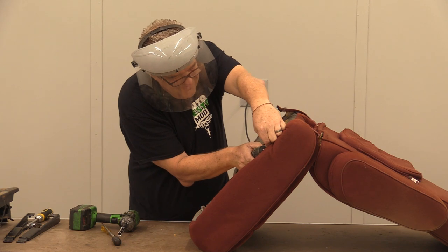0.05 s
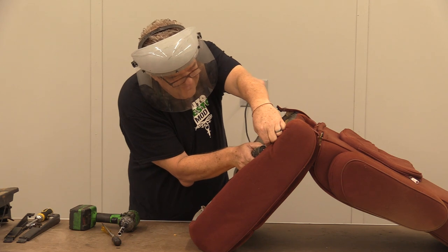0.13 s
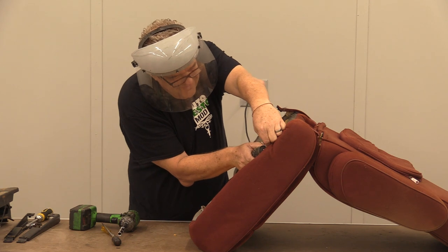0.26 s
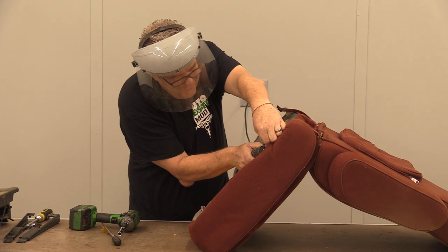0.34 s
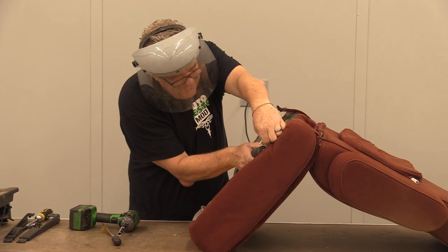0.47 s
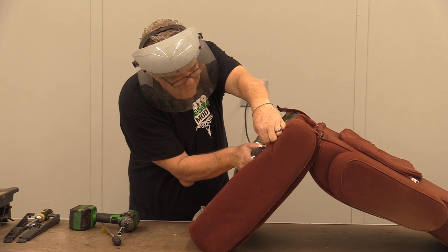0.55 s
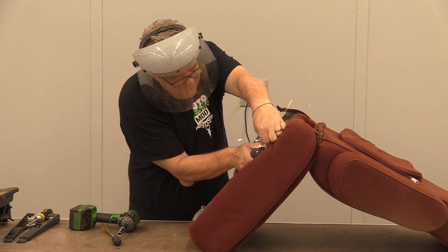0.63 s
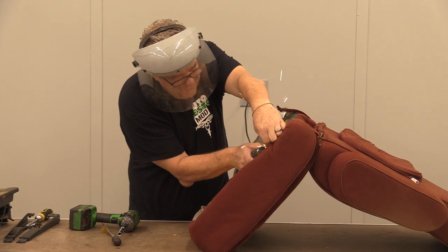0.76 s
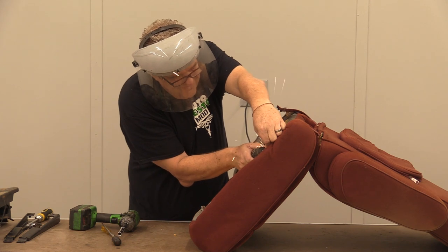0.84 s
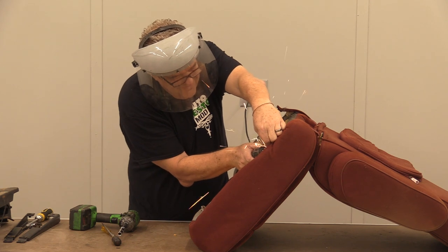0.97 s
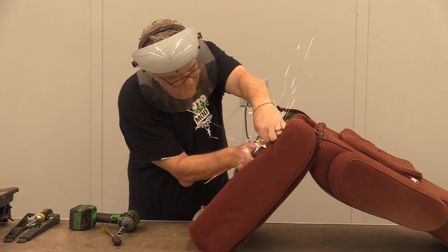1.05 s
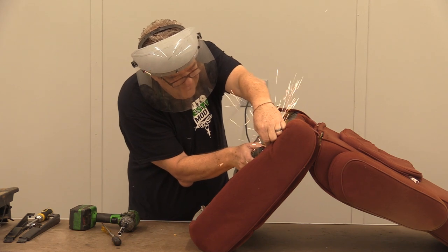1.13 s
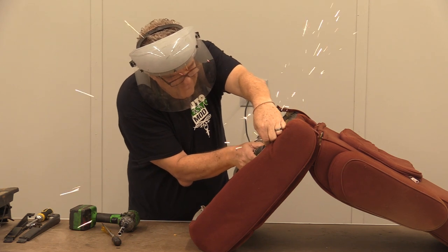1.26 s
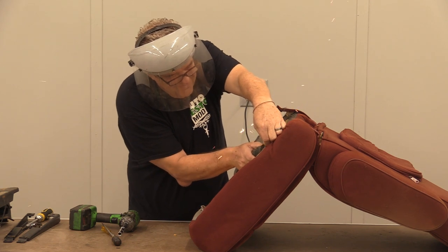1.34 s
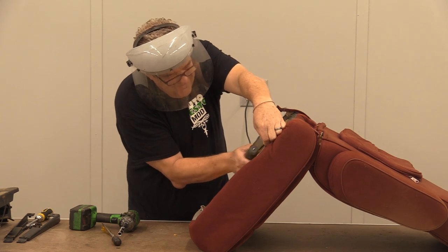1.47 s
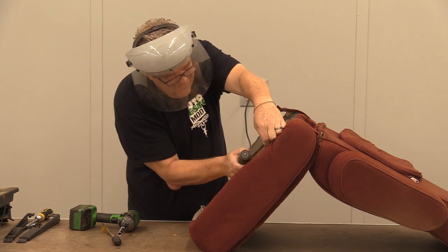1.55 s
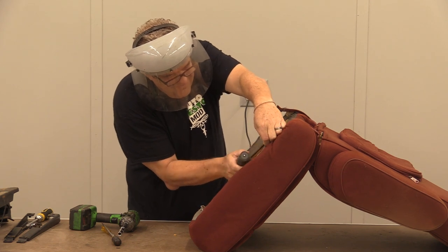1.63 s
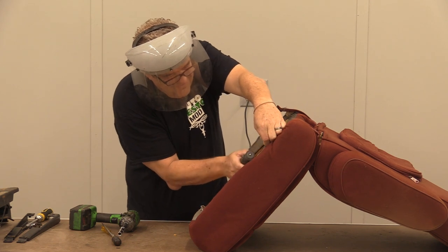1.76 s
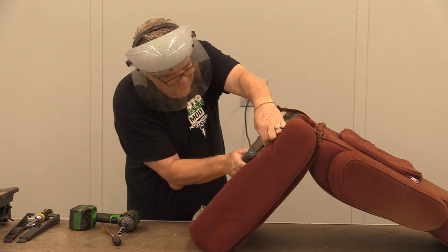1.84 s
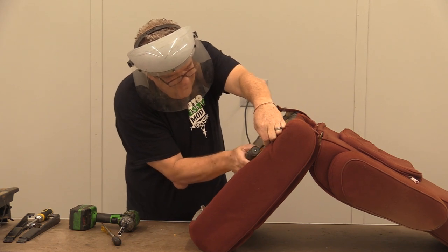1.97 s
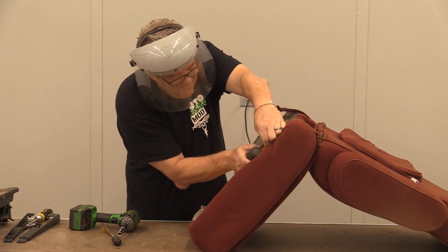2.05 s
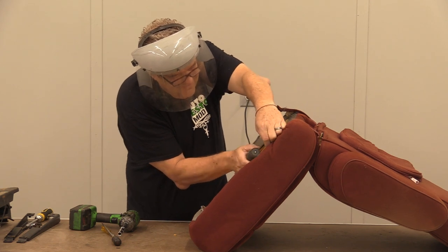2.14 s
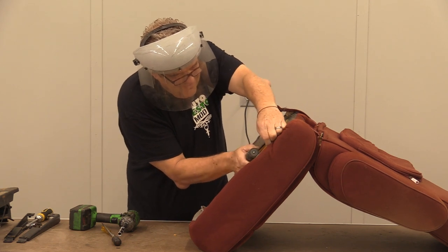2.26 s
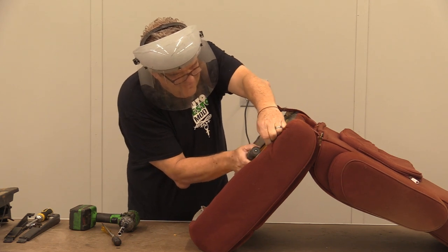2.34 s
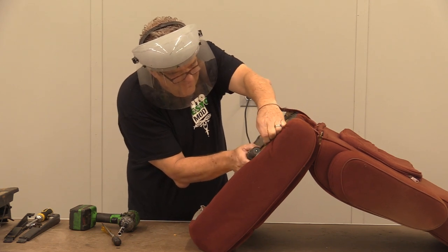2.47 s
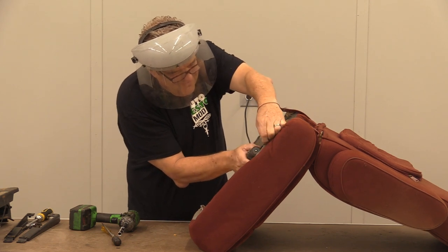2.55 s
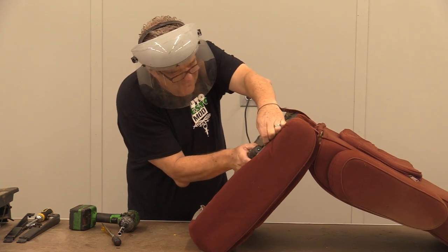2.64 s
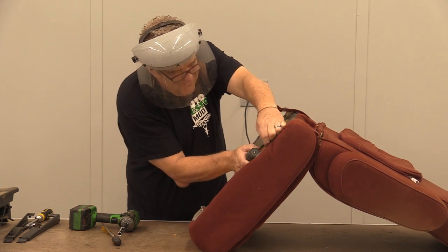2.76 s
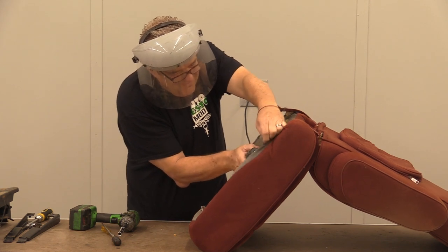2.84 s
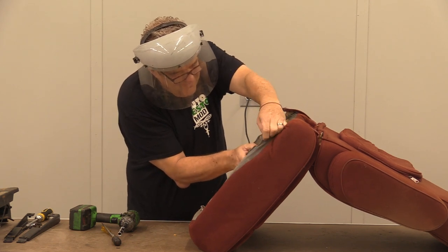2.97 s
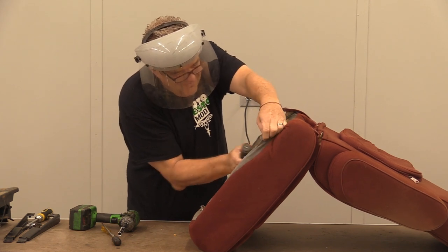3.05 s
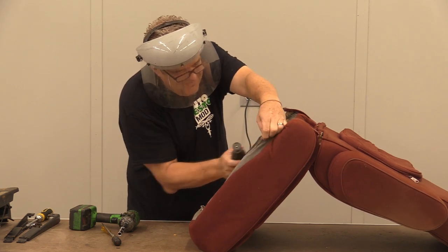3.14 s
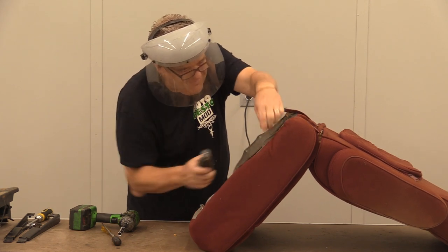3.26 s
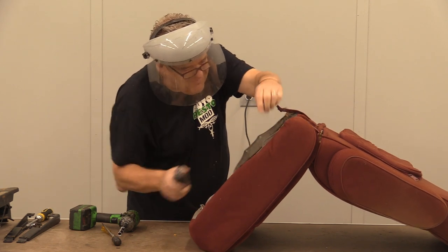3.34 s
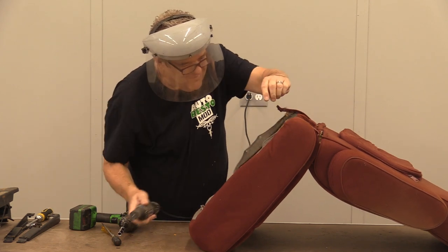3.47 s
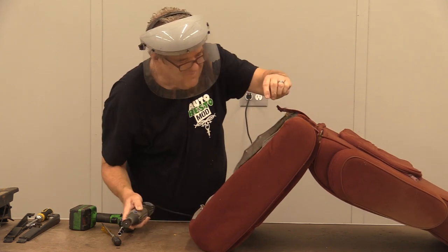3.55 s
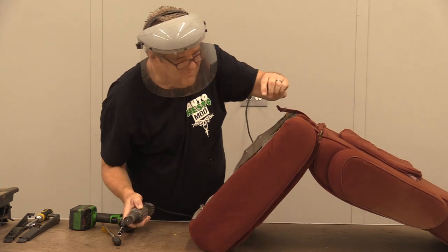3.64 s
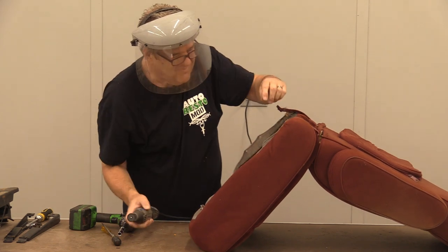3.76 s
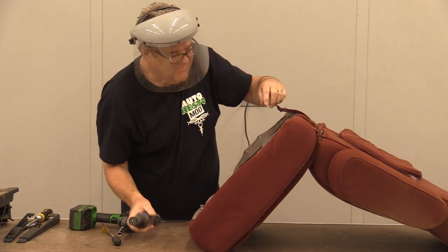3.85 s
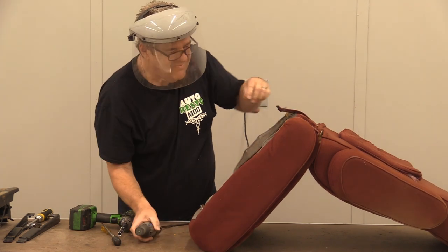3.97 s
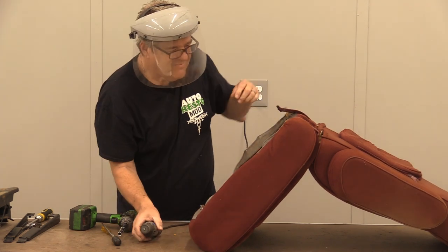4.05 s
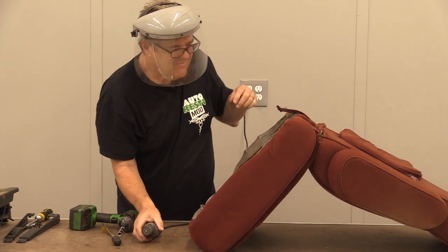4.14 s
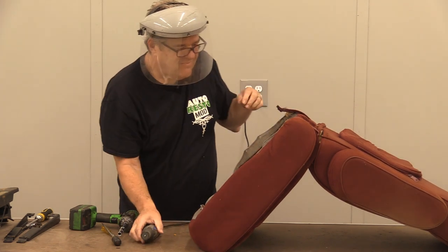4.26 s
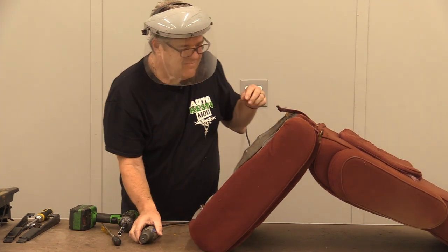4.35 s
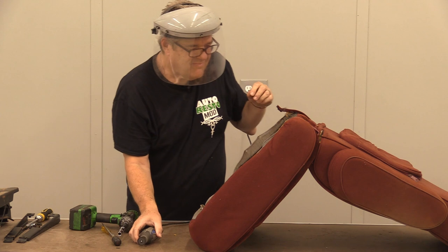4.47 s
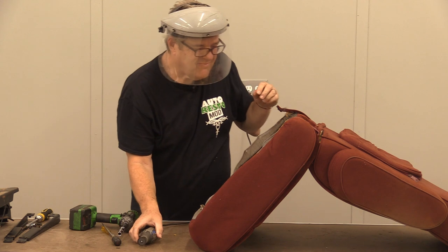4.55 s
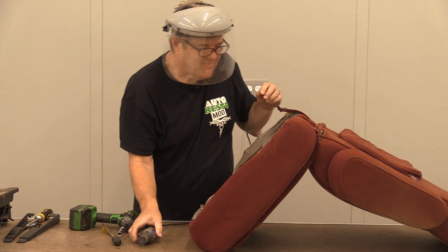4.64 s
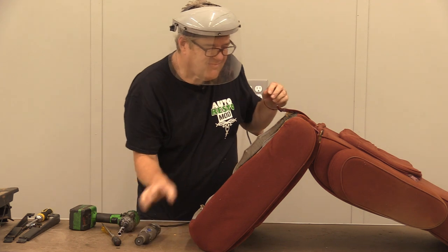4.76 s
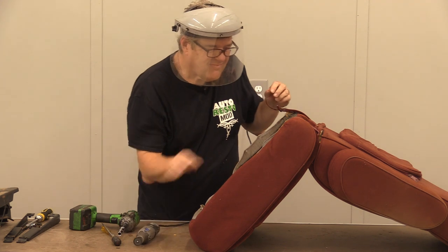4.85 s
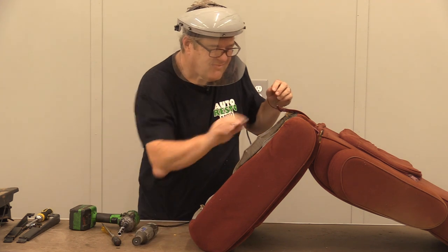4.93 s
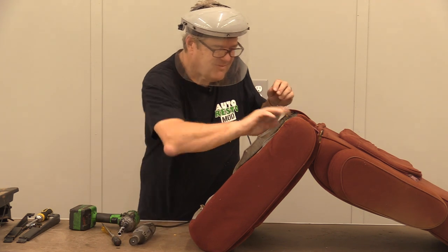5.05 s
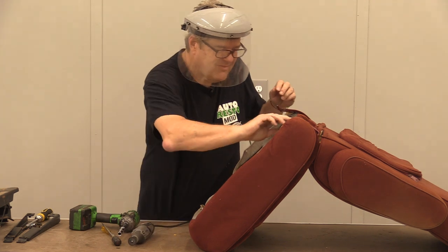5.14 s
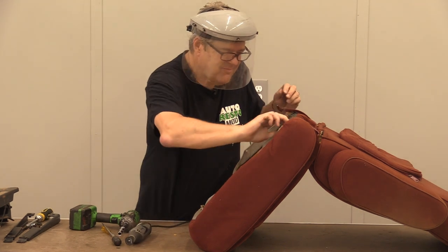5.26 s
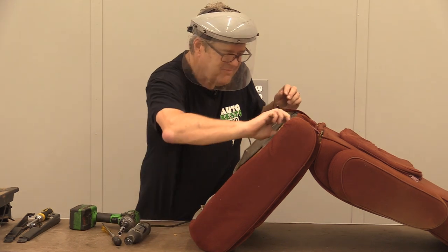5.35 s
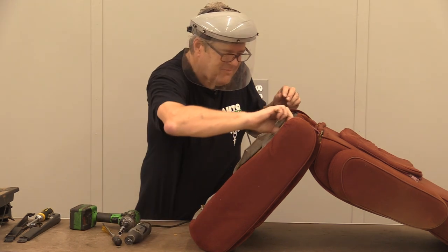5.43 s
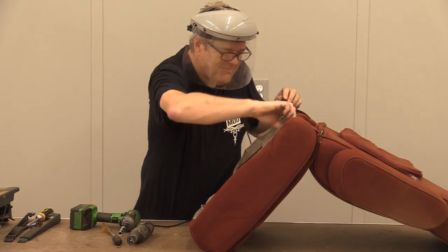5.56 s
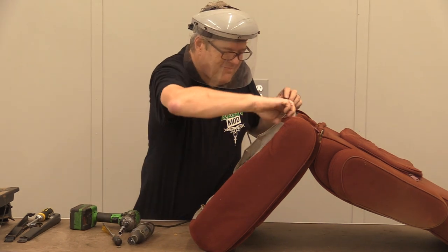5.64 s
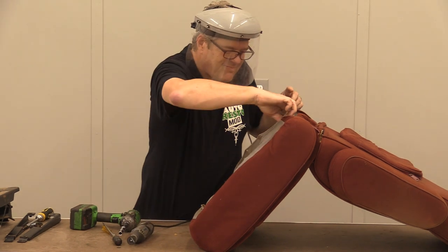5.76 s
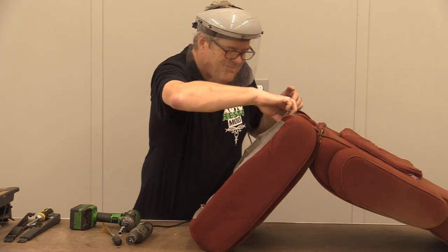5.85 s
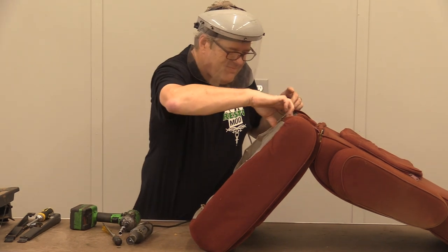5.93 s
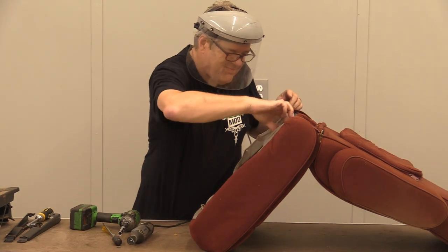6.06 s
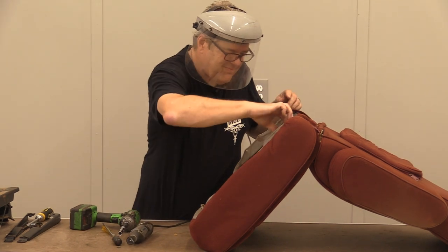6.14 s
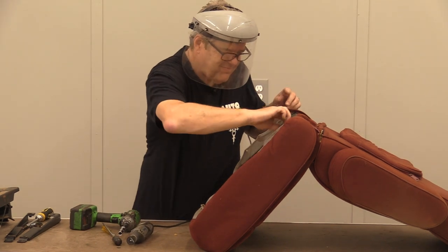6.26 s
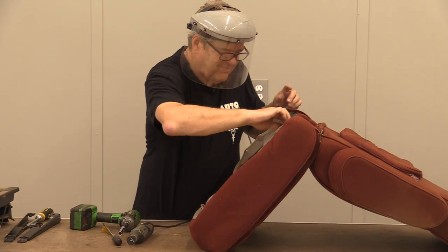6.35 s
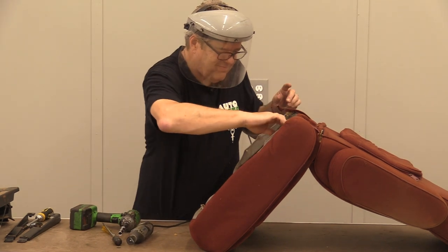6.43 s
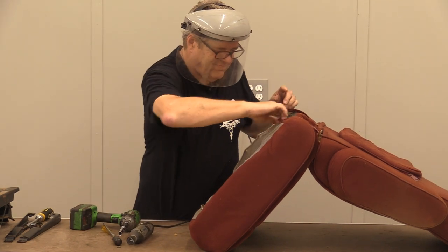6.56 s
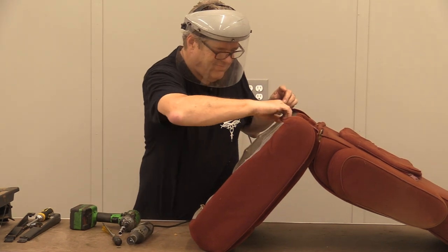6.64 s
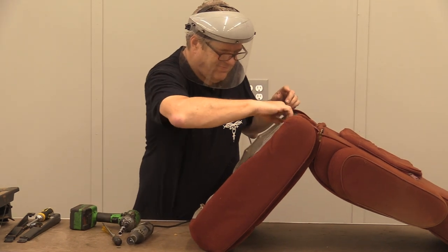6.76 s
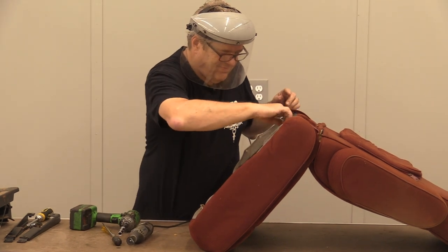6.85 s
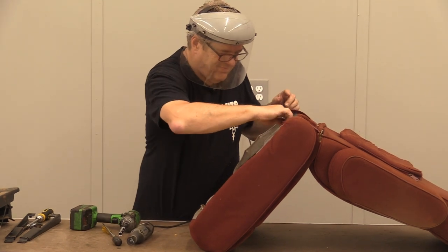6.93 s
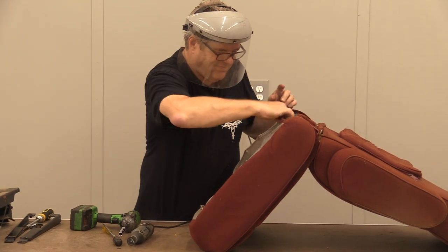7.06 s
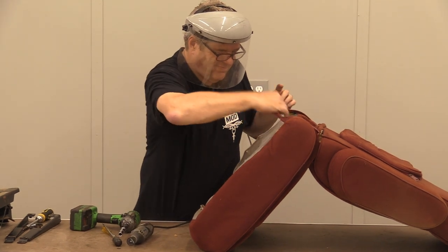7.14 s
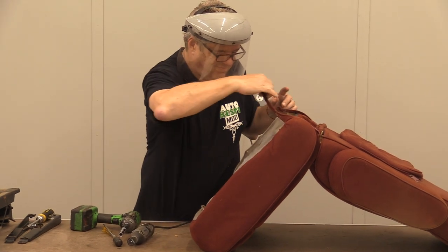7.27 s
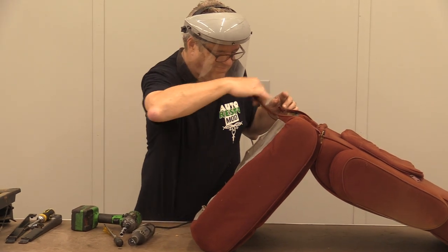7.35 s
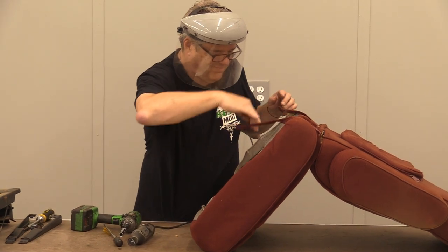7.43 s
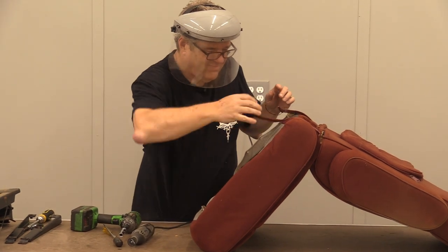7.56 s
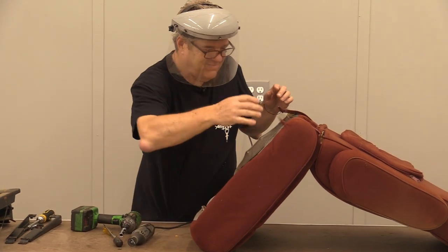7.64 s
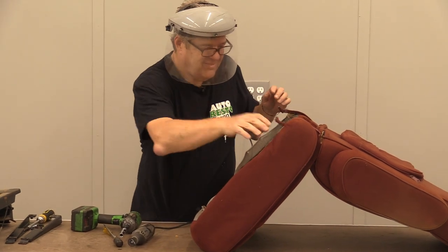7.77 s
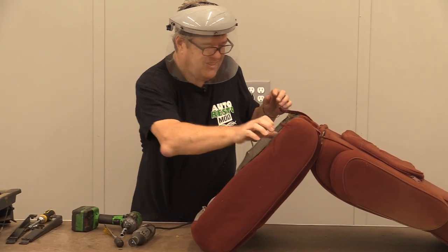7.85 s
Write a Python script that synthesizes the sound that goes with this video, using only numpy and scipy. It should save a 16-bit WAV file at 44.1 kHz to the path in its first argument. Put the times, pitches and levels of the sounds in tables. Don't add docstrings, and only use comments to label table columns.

```python
import sys
import numpy as np
from scipy import signal
from scipy.fft import rfft, irfft, next_fast_len
from scipy.io import wavfile
from scipy.ndimage import uniform_filter1d, map_coordinates

SR = 44100
rng = np.random.default_rng(int(sys.argv[2]) if len(sys.argv) > 2 else 0)


def pcm_store(signal):
    levels = np.round(np.clip(np.atleast_2d(signal), -1, 1) * 32767)
    wavfile.write(sys.argv[1], SR, levels.astype(np.int16).T)


def to_linear_factor(level_db):
    exponent = np.asarray(level_db, float) / 20
    return 10 ** exponent


N = 348390

# frequency in Hz, density in dB per Hz.
DRONE_COLOUR = [(13, -49), (22, -19), (32, -7), (66, -8.5), (97, -4.5), (205, -14), (365, -14.5),
                (634, -24.5), (858, -24.5), (1410, -32), (1660, -32.5), (3590, -44), (9950, -47),
                (14200, -45), (15900, -54)]
# frequency in Hz, level in dB.
CRACK_COLOUR = [(2500, -12), (4500, -5.5), (6200, 4), (8000, -0.5), (10000, 0), (12500, -6), (15800, -6)]


def unit(x):
    return x / np.sqrt(np.mean(x ** 2) + 1e-20)


def along(points, hz):
    f, v = np.transpose(points)
    return np.interp(np.log(hz + 1), np.log(f + 1), v)


def curves(rows, outside=None):
    s, *cols = np.transpose(rows)
    t = np.arange(N) / SR
    return [np.interp(t, s, c, outside, outside) for c in cols]


def wobble(rate):
    knots = rng.standard_normal(int(N * rate / SR) + 4)
    return map_coordinates(knots, [np.arange(N) * rate / SR], order=1)


def filtered(x, response):
    m = next_fast_len(N + SR // 2)
    return irfft(rfft(x, m) * response(np.fft.rfftfreq(m, 1 / SR)), m)[..., :N]


def modes(table):
    def response(f):
        total = 0
        for k, (centre, width, db) in enumerate(table):
            damping = 1j * f * width
            total = total + (-1) ** k * to_linear_factor(db) * damping / (centre * centre - f * f + damping)
        return total
    return response


def band(x, spectrum, lo_hz, hi_hz):
    def response(f):
        edge = 1 / np.sqrt((1 + (lo_hz / (f + 1)) ** 8) * (1 + (f / hi_hz) ** 8))
        return to_linear_factor(along(spectrum, f)) * edge
    return unit(filtered(x, response))


def burst(x, s, length, centre_hz, width_hz):
    piece = x[round(s * SR):][:round(length * SR)]
    f = np.fft.rfftfreq(len(piece), 1 / SR)
    return irfft(rfft(piece) * modes([(centre_hz, width_hz, 0)])(f) ** 2, len(piece))


def drone():
    # frequency in Hz, width in Hz, level in dB.
    boom_modes = [(98.46, 3, 3), (80.6, 5, -4.5), (130, 10, -14), (168, 8.6, -11)]
    # time in seconds, gain in dB.
    gain_ride = [(0, -17.5), (4.292, -12.5), (4.295, 0.5), (7.9, 1)]
    boom = unit(filtered(rng.standard_normal(N), lambda f: modes(boom_modes)(f) ** 2))
    rush = band(rng.standard_normal(N), DRONE_COLOUR, 15, 18000)
    return to_linear_factor(curves(gain_ride)[0]) * (to_linear_factor(-58.5) * boom + to_linear_factor(-60) * rush)


def room(x):
    t = np.arange(SR // 2) / SR
    tail = np.pad(rng.standard_normal(len(t)) * to_linear_factor(-60 * t / 0.25), (250, 0))
    wet = signal.fftconvolve(x, tail / np.linalg.norm(tail))[:N]
    return filtered(wet, lambda f: 1 / (1 + 1j * f / 3000))


def rustle():
    # time in seconds, dull part in dB, bright part in dB.
    rubbing = [(5.33, -68.5, -73), (5.52, -62, -71), (5.71, -58.5, -73), (5.83, -71.5, -84),
               (5.97, -69.5, -75.5), (6.19, -66.5, -68), (6.45, -67.5, -77.5), (6.65, -68, -77),
               (6.83, -70, -80), (7.07, -75, -82), (7.25, -55, -69.5), (7.44, -73.5, -87), (7.67, -71, -88),
               (7.9, -66.5, -81)]
    dull_db, bright_db = curves(rubbing, -120)
    dull_grains, bright_grains = [rng.standard_normal(N) * to_linear_factor(2.5 * wobble(200)) for _ in range(2)]
    dull = to_linear_factor(dull_db) * band(dull_grains, DRONE_COLOUR, 580, 3350)
    return dull + to_linear_factor(bright_db) * band(bright_grains, CRACK_COLOUR, 3300, 17000)


def thuds():
    # start in seconds, peak in dB, pitch in Hz, 60 dB decay in seconds.
    pushes = [
        (1.354, -36, 61.9, 0.11),
        (3.979, -59, 100, 0.12),
        (4.064, -45, 190.5, 0.11),
        (5.059, -42.5, 102, 0.12),
        (5.14, -49, 145, 0.11),
        (5.259, -34.5, 121, 0.11),
        (5.831, -38, 113, 0.1),
        (7.669, -45, 250, 0.1),
    ]
    out, t = np.zeros(N + SR), np.arange(SR // 2) / SR
    for s, db, pitch_hz, t60 in pushes:
        onset = 1 - np.exp(-t / 0.0026)
        out[round(s * SR):][:len(t)] += to_linear_factor(db - 60 * t / t60) * onset * np.sin(2 * np.pi * pitch_hz * t)
    return out[:N]


def puffs():
    # start in seconds, length in seconds, centre in Hz, width in Hz, level in dB.
    squeezes = [(5.504, 0.014, 746, 400, -51), (5.505, 0.09, 2770, 700, -62), (5.5, 0.1, 6960, 1500, -65.5),
                (5.653, 0.069, 1500, 1200, -56.5), (5.668, 0.036, 3480, 500, -68),
                (5.862, 0.032, 3300, 200, -69), (5.859, 0.078, 1400, 1200, -62),
                (6.048, .14, 9900, 400, -75), (6.71, .08, 750, 120, -55), (6.705, 0.071, 1500, 700, -57),
                (7.2, .15, 1570, 600, -55.5)]
    out, noise = np.zeros(N), rng.standard_normal(N)
    for s, length, centre_hz, width_hz, db in squeezes:
        hiss = unit(burst(noise, s, length, centre_hz, width_hz))
        u = np.linspace(0, 1, len(hiss))
        out[round(s * SR):][:len(hiss)] += to_linear_factor(db) * hiss * 2 * u ** 0.25 * (1 - u)
    return out


def snaps():
    # start in seconds, peak in dB, cushion in dB, crack in dB, 60 dB decay in seconds.
    tugs = [(1.359, -37, -12.5, -1, 0.043), (5.354, -53.5, -2.5, -8, 0.044), (5.432, -56, -6, -12, 0.044),
            (5.461, -65, -5, -11, 0.05), (5.61, -46.5, -5, -22, 0.046), (5.624, -26.5, -6, -5, 0.063),
            (5.65, -35.5, -5, -6.5, 0.044), (5.694, -49.5, -5, -19, 0.05), (5.754, -52, -10, -20, 0.05),
            (5.794, -54, -3, -5, 0.043), (5.894, -47, -20, -16, 0.056), (6.122, -57, -11, -6, 0.055),
            (6.145, -56, -8, -8, 0.046), (6.196, -52.5, -12, -7, 0.054), (6.267, -53, -13, -14, 0.05),
            (6.451, -44.5, -20, -18, 0.05), (6.465, -49, -18, -10, 0.044), (6.539, -49.5, -18, -2, 0.045),
            (6.577, -44, -29, -21, 0.05), (6.582, -24, -20.5, -16, 0.034), (6.64, -41.5, -20, -22, 0.036),
            (6.716, -41, -24, -32, 0.048), (6.844, -57, -11, -4, 0.05), (6.87, -58, -7, 0, 0.045),
            (6.977, -59, -8, -5, 0.05), (7.089, -28, -11.5, -14, 0.075), (7.103, -28, -15, -14, 0.12),
            (7.113, -20.5, -12, -17, 0.046), (7.127, -19.5, -13, -12, 0.059),
            (7.138, -21.5, -19, -10, 0.053), (7.146, -16.5, -9.5, -17, 0.035), (7.155, -30, -2, -13, 0.041),
            (7.404, -58, -8, -4, 0.05), (7.447, -50.5, -11, -22, 0.046), (7.702, -45, -7.5, -11, 0.044)]
    # frequency in Hz, width in Hz, level in dB.
    upholstery = [
        [(163.5, 39, 5), (236, 77, -1)],
        [(447, 94, 2), (700, 190, -3), (1110, 230, -8), (1720, 520, -14.5), (2560, 860, -22)],
    ]
    low, body, top = np.zeros((3, N + SR))
    t = np.arange(SR // 4) / SR
    for s, db, cushion_db, crack_db, t60 in tugs:
        at, draw = round(s * SR), rng.standard_normal((2, len(t)))
        low[at:][:len(t)] += to_linear_factor(db + cushion_db + 18) * np.exp(-t / 0.001)
        body[at:][:len(t)] += to_linear_factor(db + 13 - 60 * t / t60) * draw[0]
        body[at] += to_linear_factor(db + 27)
        top[at:][:len(t)] += to_linear_factor(db + crack_db + 2 - 60 * t / (0.5 * t60)) * draw[1]
    cushion = filtered(low[:N], modes(upholstery[0]))
    cover = filtered(body[:N], modes(upholstery[1]))
    crack = filtered(top[:N], lambda f: to_linear_factor(along(CRACK_COLOUR, f) - 30 * (f < 2500)))
    return cushion + cover + crack


def shaft():
    # time in seconds, turns per second; under load, free, coasting, coming to rest.
    loaded = [(0.0, 352.7), (0.084, 346.7), (0.158, 352.4), (0.272, 355.5), (0.374, 352.4), (0.534, 339.7),
              (0.668, 310.8), (0.742, 307.9), (0.944, 306.7), (1.056, 293.8), (1.12, 277.9), (1.178, 271.8),
              (1.234, 275.2), (1.27, 288)]
    free = [(1.29, 299), (1.43, 354.8), (1.49, 373.4), (1.52, 377.4), (1.58, 379.3), (1.91, 364.8),
            (2.18, 371.8), (2.2, 368.4), (2.35, 370), (2.53, 371.4), (2.61, 368.2), (2.83, 368),
            (2.96, 370.9), (3.23, 369.3), (3.31, 370.3), (3.32, 368), (3.44, 361.6), (3.59, 366),
            (3.6, 367)]
    slowing = [(3.62, 359), (3.752, 323.5), (3.938, 277.5), (4.134, 231.3), (4.238, 207), (4.376, 176.3),
               (4.476, 157), (4.6, 130.3)]
    stopping = [(4.69, 117), (4.79, 91), (4.91, 70), (5.0, 56), (5.1, 38), (5.2, 21), (5.33, 5.6)]
    hz = curves(loaded + free + slowing + stopping)[0]
    return hz, np.cumsum(hz) / SR


def tone(order, turns, blur):
    start = rng.uniform(0, 2 * np.pi)
    return np.sqrt(2) * np.sin(2 * np.pi * order * turns + start + blur * wobble(90))


def ticks():
    # time in seconds, peak in dB.
    last_bars = [(5.2004, -42), (5.206, -45), (5.2184, -39), (5.2244, -48), (5.2314, -49), (5.2374, -45),
                 (5.2455, -45), (5.2537, -43), (5.262, -39), (5.2724, -46), (5.2829, -41), (5.297, -45),
                 (5.3162, -38.5)]
    out, t = np.zeros(N), np.arange(400) / SR
    for s, db in last_bars:
        out[round(s * SR):][:len(t)] += to_linear_factor(db - 3 - 60 * t / 0.013) * rng.standard_normal(len(t))
    casing = modes([(5800, 2000, -10), (9700, 970, 1), (13060, 2200, 0), (15000, 1500, -9)])
    return 2.36 * filtered(out, casing)


def air(hz, turns):
    # time in seconds, low, mid and high band in dB.
    rush_levels = [
        [(1.28, -51, -47.5, -53), (1.37, -52, -50, -48.5), (1.7, -53, -47, -53), (1.96, -53, -49, -53.5),
         (2.34, -53.5, -48.5, -58), (2.89, -53, -47.5, -63), (3.14, -53.5, -47, -51), (3.25, -52, -43, -65),
         (3.38, -52.5, -51.5, -49.5), (3.55, -55, -53.5, -50), (3.69, -56.5, -56, -45), (3.88, -59, -53.5, -56),
         (4.07, -61.5, -56.5, -56), (4.29, -65, -58, -61)],
        [(4.297, -49, -42, -47), (4.347, -51.5, -49.5, -41), (4.475, -53, -47.5, -45.5),
         (4.655, -55.5, -51, -47), (4.797, -61.5, -60, -53.5), (5.159, -60.5, -62, -53), (5.269, -61, -74, -61),
         (5.32, -69, -71, -67)],
    ]
    # frequency in Hz, density in dB per Hz.
    fan_colour = [(15, -50), (25, -16), (96, -16), (308, -20.5), (362, -12.5), (622, -10), (731, -4),
                  (1010, -9), (1100, -6), (1290, -4.5), (2980, -14), (4120, -29.5), (7460, -6.5),
                  (9020, -10), (15900, -9)]
    brush_colour = [(180, -37), (300, -12), (655, -17.5), (736, -7), (1010, -9), (1170, 0), (1320, -3.5),
                    (2730, -8.5), (2970, -12), (5870, -5.5), (7530, -9.5), (10200, 2), (12400, -5.5),
                    (13500, -2), (15900, -1)]
    since_bar = (8 * turns % 1) / (8 * hz)
    scratch = curves([(4.3, 0.063), (4.8, 0.36), (5.1, 0.56), (5.2, 1), (5.33, 0.27)])[0]
    gate = 1 - scratch + 2.5 * scratch * np.exp(-since_bar / 0.0012)
    fan_share = curves([(3.2, 0.94), (3.5, 0.45), (4.0, 0.2), (4.29, 0.11), (5.3, 0.01)])[0]
    out, bands_hz = 0, [(30, 4800), (4000, 9370), (8800, 23400)]
    for level_db, (lo_hz, hi_hz) in zip(curves(rush_levels[0] + rush_levels[1], -120), bands_hz):
        noise = rng.standard_normal((2, N)) * to_linear_factor(1.07 * wobble(15) + 0.93 * wobble(120))
        fan = np.sqrt(fan_share) * band(noise[0], fan_colour, lo_hz, hi_hz)
        brushes = np.sqrt(1 - fan_share) * gate * band(noise[1], brush_colour, lo_hz, hi_hz)
        out = out + to_linear_factor(level_db + 1.5) * (fan + brushes)
    return out


def coasting(hz, turns):
    # time in seconds, unbalance in dB, commutator in dB.
    whine = [(3.6, -59.5, -56.5), (3.9, -65, -58.5), (4.1, -79, -65.5), (4.285, -62, -67),
             (4.297, -48, -52), (4.5, -47.5, -54), (4.7, -54, -59), (4.9, -69, -66), (5.05, -75, -79),
             (5.2, -95, -85)]
    bar_orders = [3, 7, 8, 12, 16, 24, 32, 40, 48, 56, 64, 72, 80, 88, 96]
    bar_levels = [-19, -14.5, 1, -8, -5.5, -1.5, -1.5, -7.5, -6, -3, -4, -1, -13, -14, -9]
    # frequency in Hz, width in Hz, level in dB.
    casing = [(1169, 150, 7.5), (1500, 510, -0.5), (2282, 400, 3.5), (2918, 370, 1), (4200, 360, 3),
              (5300, 580, 2.5), (6290, 650, 4), (7300, 780, -2.5), (9030, 1300, 2.5), (12900, 1500, -7)]
    unbalance_db, commutator_db = curves(whine, -120)
    comb = 0
    for k, db in zip(bar_orders, bar_levels):
        ragged = to_linear_factor(db + 4.1 * wobble(12) + 1.7 * wobble(70))
        comb = comb + ragged * tone(k, turns, 0.25 + 0.0094 * k) * (k * hz < 15500)
    unbalance = to_linear_factor(unbalance_db + 1.4 * wobble(23)) * tone(1, turns, 0.17)
    return unbalance + filtered(to_linear_factor(commutator_db) * comb, lambda f: modes(casing)(f) ** 2)


def running(hz, turns):
    # time in seconds, levels of orders 1, 2, 3, 8 and 24 in dB.
    main_tones = [(1.275, -56, -70, -58, -43.5, -55), (1.42, -67, -57, -58, -53.5, -42),
                  (1.52, -67.5, -55, -54, -66, -44), (1.7, -64, -58.5, -54.5, -70, -41.5),
                  (1.85, -68, -57.5, -56.5, -64, -44.5), (2.1, -66, -56, -57, -67, -42.5),
                  (2.3, -60.5, -56.5, -54.5, -67, -47.5), (2.5, -61, -56, -54, -71, -45),
                  (2.8, -62.5, -55.5, -57.5, -67, -41.5), (3.0, -59.5, -58, -53, -65, -46.5),
                  (3.15, -66, -60, -58, -65, -42), (3.3, -59, -63, -56, -59.5, -46),
                  (3.4, -59, -69, -54, -62, -45.5), (3.47, -68, -79, -55, -57.5, -62),
                  (3.6, -68, -82, -75, -55, -60)]
    # order, order it follows; then their levels in dB below or above it.
    weak_orders = [(4, 3), (12, 24), (16, 24), (25, 24)]
    weak_levels = [-7.5, -29, -18, -13]
    levels = dict(zip((1, 2, 3, 8, 24), curves(main_tones, -120)))
    levels.update({k: levels[lead] + db for (k, lead), db in zip(weak_orders, weak_levels)})
    mains = np.cos(2 * np.pi * 120 * np.arange(N) / SR)
    pull = curves([(1.27, 0.82), (1.45, 0.39), (1.6, 0.15), (3.6, 0.16)])[0]
    out = 0
    for k, db in levels.items():
        ripple = 1 + pull * mains * (k % 8 == 0)
        out = out + to_linear_factor(db + 1.52 * wobble(40)) * tone(k, turns, 0.012 * k + 0.13) * ripple
    return out


def grinding(hz, turns):
    # time in seconds, rumble, frame, wheel and edge bands in dB.
    cut_levels = [(0.0, -41.5, -46, -43, -41), (0.034, -37, -50, -38, -45.5), (0.116, -41.5, -47, -42, -39),
                  (0.282, -39.5, -47, -40, -43), (0.312, -42.5, -50, -43, -53),
                  (0.454, -40.5, -44, -40.5, -39.5), (0.63, -38, -43.5, -37.5, -49),
                  (0.662, -37.5, -40, -38, -40), (0.786, -41, -39, -40.5, -38.5),
                  (0.936, -40.5, -42.5, -41, -43.5), (1.174, -37.5, -37.5, -36.5, -41),
                  (1.238, -34, -43.5, -37, -38), (1.275, -44, -46, -44, -41)]
    # frequency in Hz, density in dB per Hz.
    grit_colour = [(15, -35), (25, -3), (217, -5.5), (317, 1), (404, -5), (605, -6.5), (1640, -7.5),
                   (1880, -2.5), (4470, -14), (7670, -13), (8780, -25), (9520, -5.5), (11800, -21.5),
                   (14700, -10.5), (15900, 0.5)]
    # frequency in Hz, width in Hz, level in dB.
    ring_modes = [(700, 520, -3.5), (2140, 720, 3.5), (3790, 3000, -14), (7640, 1200, -1.5),
                  (9750, 730, -6.5), (14300, 1200, -3), (15300, 600, -20)]
    n = round(1.3 * SR)
    comb = np.zeros(N)
    for k in range(1, 60):
        slow, fast = wobble(14)[:n], wobble(70)[:n]
        size = to_linear_factor(4.24 * slow + 2.6 * fast) * (k * hz[:n] < 15800)
        wander = rng.uniform(0, 2 * np.pi) + (0.32 + 0.012 * k) * fast
        comb[:n] += size * np.sin(2 * np.pi * k * turns[:n] + wander)
    comb = filtered(comb, lambda f: modes(ring_modes)(f) + to_linear_factor(-14))
    grit = rng.standard_normal(N) * to_linear_factor(2.5 * wobble(160)) * (1 + 0.36 * np.cos(2 * np.pi * turns))
    flat, out = [(20, 0), (20000, 0)], 0
    parts = [(20, 1140, 0.31), (1200, 3300, 0.71), (4330, 11400, 0.47), (11800, 22000, 0.46)]
    for level_db, (lo_hz, hi_hz, share) in zip(curves(cut_levels, -120), parts):
        steady = band(comb, flat, lo_hz, hi_hz) * np.sqrt(n / N)
        torn = band(grit, grit_colour, lo_hz, hi_hz)
        out = out + to_linear_factor(level_db) * (np.sqrt(share) * steady + np.sqrt(1 - share) * torn)
    return out


def scene():
    hz, turns = shaft()
    hands = snaps() + thuds() + puffs()
    tool = grinding(hz, turns) + running(hz, turns) + coasting(hz, turns) + air(hz, turns) + ticks()
    mono = drone() + rustle() + hands + to_linear_factor(-15) * room(hands) + tool
    return np.array([mono, mono])


def roll_off(x):
    return signal.sosfilt(signal.butter(12, 16920, fs=SR, output="sos"), x)


def record(dry):
    # time in seconds, centre in Hz.
    flickers = [(.36, 6300), (.5, 13700), (.69, 9700), (.69, 14500), (.8, 5800), (1.13, 10300),
                (1.13, 14500), (1.755, 5200), (2.01, 9700), (2.01, 11600), (2.08, 15100), (2.38, 12400),
                (2.4, 4700), (2.71, 15100), (3.0, 10300), (3.29, 13000), (3.29, 5200), (3.31, 8900),
                (3.47, 7600), (3.47, 15100), (3.68, 8600), (3.68, 13000), (4.08, 5200), (4.49, 10000)]
    quiet = uniform_filter1d(dry[0] ** 2, 2048) < to_linear_factor(-46) ** 2
    hiss = band(rng.standard_normal(N), [(20, 0), (20000, 0)], 2200, 12000)
    side = to_linear_factor(-86) * quiet * hiss
    shuffled = dry[0] * unit(filtered(rng.standard_normal(N), lambda f: f < 300))
    for s, centre_hz in flickers:
        piece = burst(shuffled, s - 1024 / SR, 2048 / SR, centre_hz, 1800)
        side[round(s * SR - 1024):][:2048] += 0.9 * piece * np.hanning(2048)
    mix = filtered(dry + np.array([side, -side]), lambda f: f < 15850)
    return roll_off(mix)


dry = scene()
out = record(dry)
pcm_store(out)
```